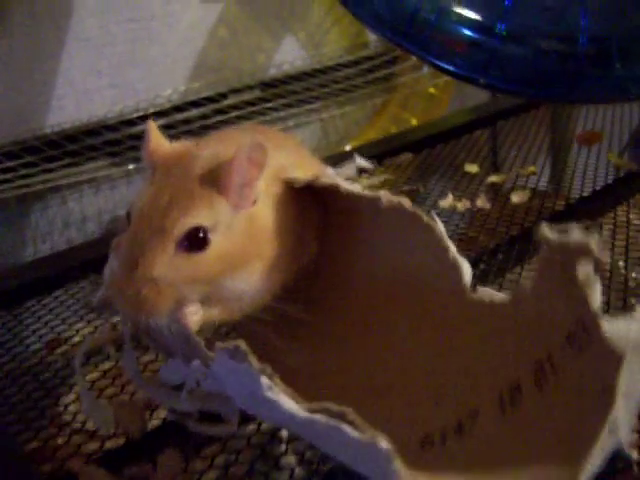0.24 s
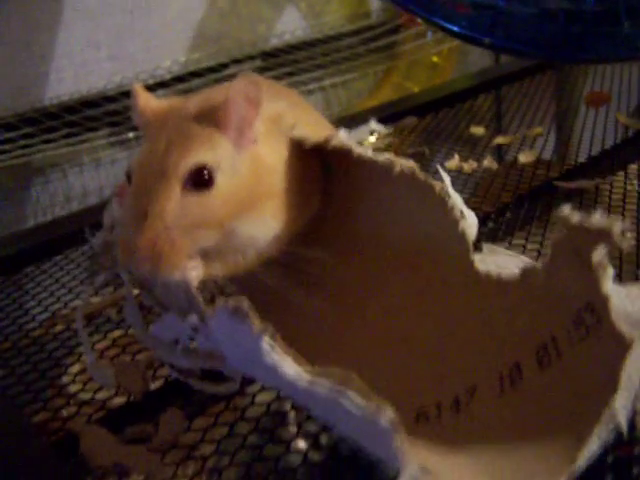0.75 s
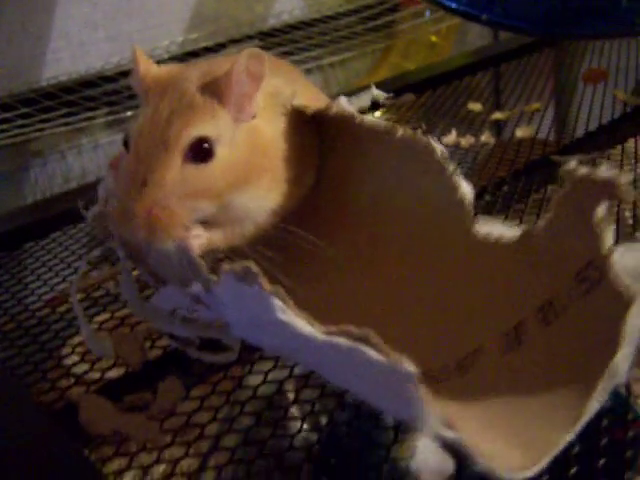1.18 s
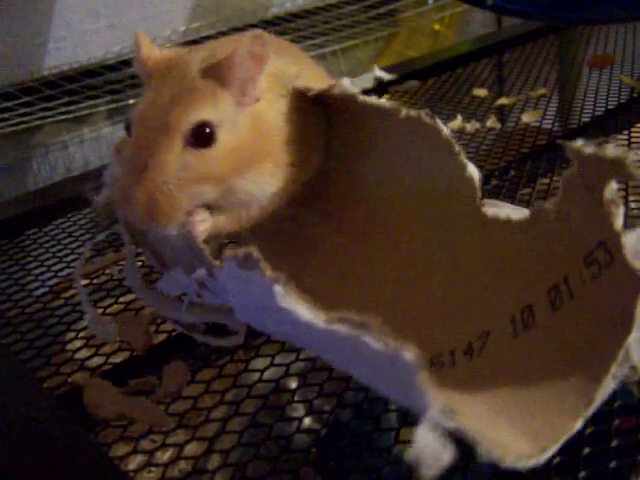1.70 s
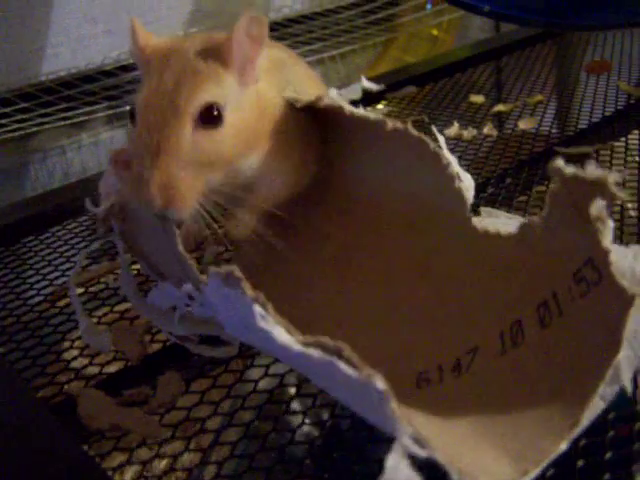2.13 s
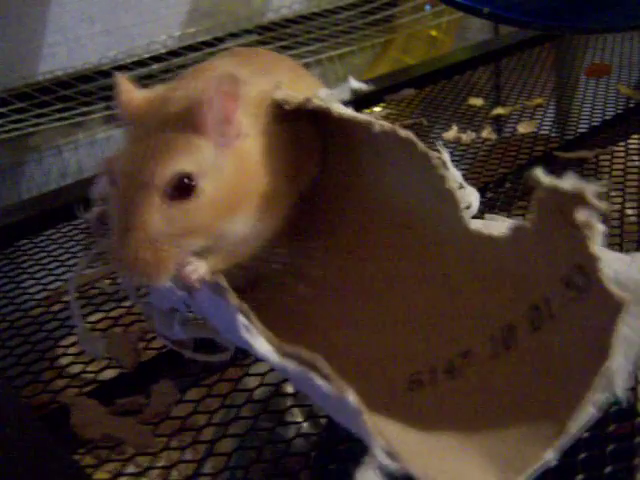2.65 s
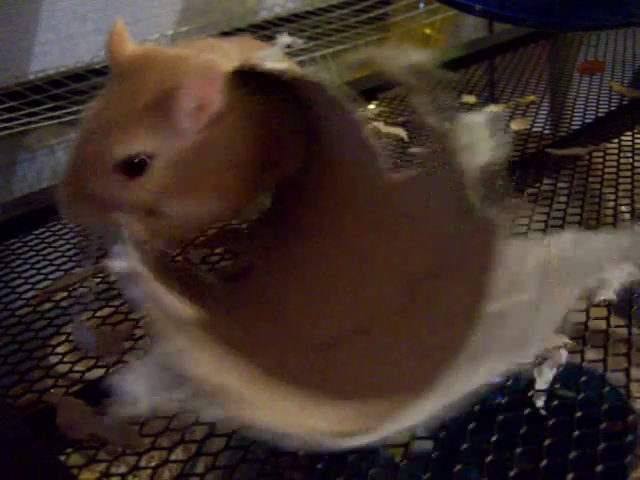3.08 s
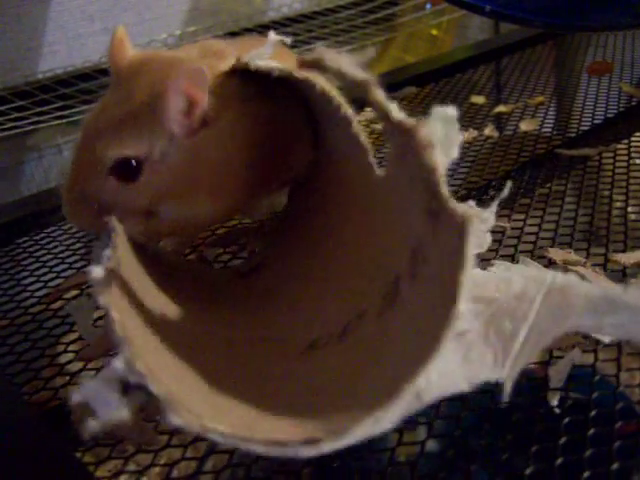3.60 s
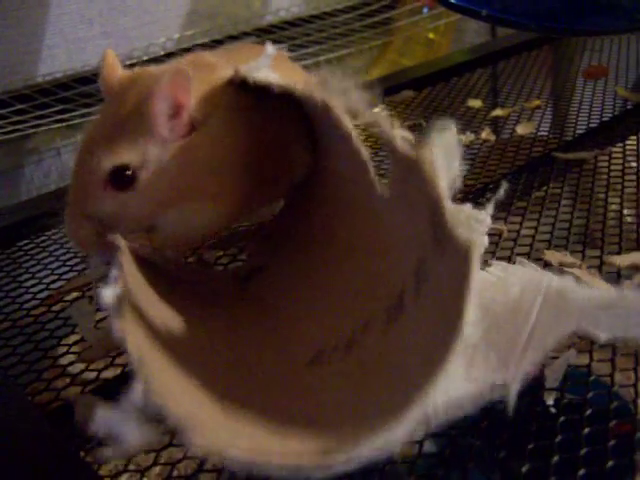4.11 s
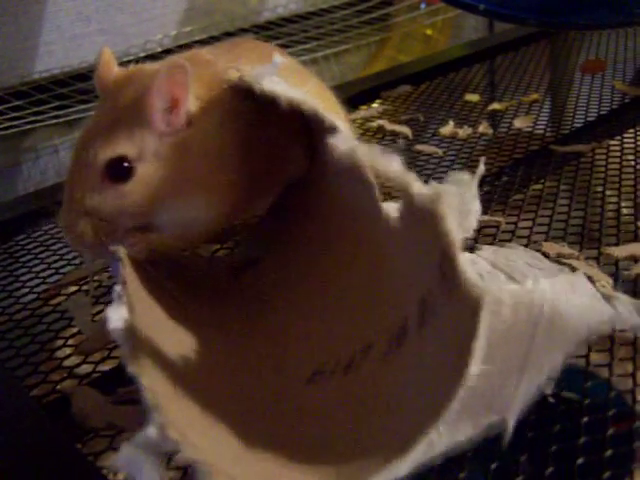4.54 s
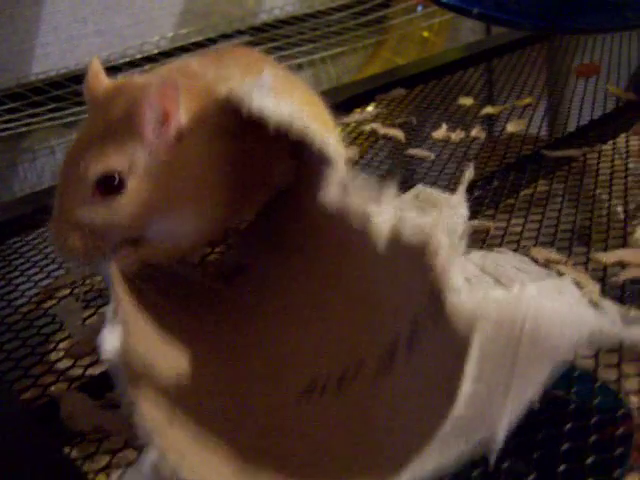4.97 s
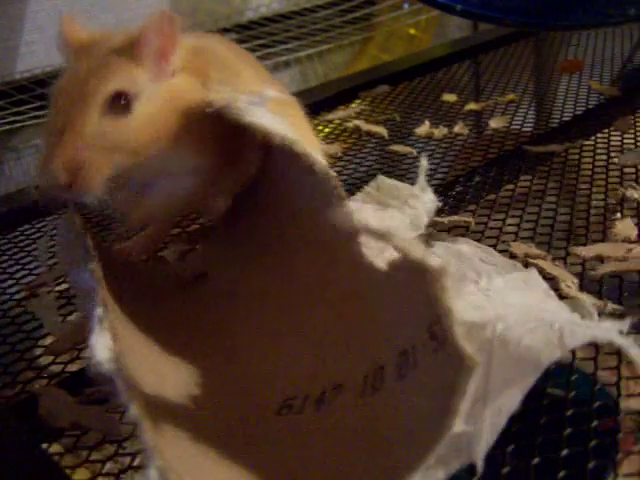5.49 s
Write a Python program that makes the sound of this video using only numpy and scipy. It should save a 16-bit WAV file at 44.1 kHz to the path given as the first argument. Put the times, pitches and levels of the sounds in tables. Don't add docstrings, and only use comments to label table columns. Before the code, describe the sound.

Close, dry crackles and sharp snaps as a gerbil gnaws a cardboard tube, papery rustling between bites over a faint low drone.

```python
import sys
import numpy as np
from scipy import signal
from scipy.io import wavfile
from scipy.ndimage import uniform_filter1d

SR = 44100
rng = np.random.default_rng(int(sys.argv[2]) if len(sys.argv) > 2 else 0)


def volts(x):
    e = np.asarray(x, float) / 20
    return 10 ** e


def int16_out(signal):
    q = np.round(np.clip(np.atleast_2d(signal).T, -1, 1) * 32767)
    wavfile.write(sys.argv[1], SR, q.astype(np.int16))


N = 253134

# start in seconds, peak in dB,
# ring in Hz, relative fibre brightness in dB, cascade length in ms.
RIM_BITES = [(0.0095, -24, 3000, -12, 1.8), (0.2918, -7.5, 2980, -5.5, 4.9), (0.6492, -20, 2890, -4.5, 3),
             (0.8406, -4.5, 3080, -11.5, 2.9), (0.9327, -17.5, 3020, -6.5, 5.9),
             (1.0715, -13.5, 2833, -7, 7), (1.2178, -23, 3370, -6, 3.1), (1.5616, -8, 3570, -10, 4.5),
             (1.735, -22, 3070, -7, 4.3), (1.9012, -16, 3070, -7, 4), (2.3805, -19, 3526, -12.5, 15),
             (2.621, -11, 2660, 0.5, 4.1), (2.7159, -22, 3000, -11.5, 11), (2.7256, -21, 3160, 6, 15),
             (2.8694, -27.5, 2800, -12, 5), (3.0144, -30, 2760, -7, 19), (3.022, -24.5, 2805, -12, 3.7),
             (3.169, -25, 2830, -11.5, 13), (3.279, -17.5, 2635, -3, 1.1), (3.2889, -22.5, 2410, -11, 6),
             (3.4202, -18, 2646, -7.5, 3.6), (4.3732, -21, 3000, -5, 8.5), (5.3079, -29, 2620, -6.5, 8.3),
             (5.6918, -13.5, 3700, -13, 1.7)]
# start in seconds, peak in dB,
# ring in Hz, relative fibre brightness in dB, cascade length in ms.
DEEP_BITES = [(0.1443, -11.5, 3650, -22, 6.1), (0.166, -25, 3390, -17.5, 12),
              (0.3383, -12, 3300, -14.5, 5.1), (1.101, -19.5, 3830, -8.5, 5.9),
              (1.2875, -23.5, 3000, -24, 1.2), (1.608, -26.5, 3340, -14, 4.5),
              (1.6607, -26, 1711, -6.5, 13), (1.8269, -12, 3660, -22.5, 7.1), (1.8496, -24, 1920, -17, 15),
              (1.9208, -15, 2820, -16, 4.1), (2.2141, -23.5, 2780, -17, 3.8), (2.5071, -24.5, 1520, 0, 13),
              (2.7845, -14.5, 3070, -8, 3.4), (2.91, -22, 4830, -11.5, 8.3), (3.4596, -22, 4140, -6, 4.4),
              (3.6642, -26.5, 1700, -1.5, 20), (3.7593, -22.5, 1920, -0.5, 2.3),
              (3.9398, -15.5, 3820, -13, 6.6), (4.1111, -23, 3710, -7.5, 12.4),
              (4.5835, -22.5, 2650, -7, 4.7), (4.5947, -23.5, 3040, -4.5, 12),
              (4.707, -15.5, 3000, -9.5, 11.6), (5.1322, -21, 3030, -0.5, 4.1),
              (5.1754, -5, 1870, -12.5, 1.7)]
# start in seconds, peak in dB,
# relative fibre brightness in dB, cascade length in ms.
NIBBLES = [(0.015, -24, -24, 4.9), (0.243, -29.5, -10, 7), (0.3766, -22.5, -14, 1.3),
           (0.4396, -32, -24, 2.3), (0.5135, -28.5, -32, 4.1), (0.637, -28, -7, 2.2),
           (0.6574, -26, -1, 4.7), (0.7295, -32.5, 0, 8.1), (0.8238, -26, -4, 5.3),
           (0.9813, -25.5, -10, 5.7), (1.0652, -28, -4, 4.3), (1.1241, -25, -7, 8.8),
           (1.2338, -23, -6.5, 3.1), (1.3648, -27.5, -8, 11), (1.3731, -26, 3, 1.8),
           (1.4512, -30, -12.5, 13), (1.534, -29, -5.5, 1.1), (1.6945, -26, -6, 1.6),
           (1.7257, -24.5, -8, 19), (1.7587, -43.5, -15, 6.2), (1.9105, -13.5, -14.5, 6.1),
           (1.947, -28.5, -9, 11), (2.43, -25.5, -7, 5.7), (2.5231, -28.5, -22, 6.8), (2.5472, -22.5, 5, 5),
           (2.604, -31, -12, 3), (2.6516, -24, -28, 8.6), (2.7384, -14.5, -4, 3.4), (2.7443, -21, 13, 1.5),
           (2.862, -28, -20, 6.2)]
# start in seconds, peak in dB,
# relative fibre brightness in dB, cascade length in ms.
ROLLED_NIBBLES = [(2.9665, -30, -3, 27), (3.047, -31.5, -9, 7.6), (3.2215, -36.5, -12, 14),
                  (3.4784, -31, -9.5, 3.2), (3.6833, -29.5, -21, 12), (3.7402, -30, -1.5, 25),
                  (3.8677, -33, -8, 11), (3.9012, -24, 1, 3.2), (3.9115, -32, 1.5, 6.1),
                  (4.1353, -25.5, -8, 3), (4.196, -31, 8, 3.3), (4.296, -32, -4, 8.9),
                  (4.422, -31, -10, 5.5), (4.624, -26, 9, 3), (4.6917, -32.5, -20, 5),
                  (4.7796, -29.5, -2, 2.4), (4.8393, -22, -10.5, 4.9), (4.8656, -32.5, -9, 5.9),
                  (4.9624, -25.5, -8, 13), (4.9698, -27.5, -24, 3.8), (4.9819, -24, -3.5, 23),
                  (5.0439, -33.5, -9, 11), (5.1602, -40, -8.5, 3.2), (5.169, -25, 9, 11.9),
                  (5.239, -29.5, 1, 5.9), (5.252, -29.5, -14, 11), (5.272, -23.5, 4, 5.5),
                  (5.2803, -24, -15, 1.9), (5.5296, -30.5, -2.5, 3.2), (5.580, -20.5, -4.5, 11)]
# start in seconds, peak in dB, ring in Hz.
TICKS = [(0.27, -40, 2850), (0.8003, -44, 2850), (1.208, -32, 2900), (1.4636, -39, 4110),
         (1.7946, -44, 3430), (2.0123, -32.5, 2750), (2.079, -43, 2700), (2.116, -34.5, 4800),
         (2.57, -30.5, 5270), (2.6152, -37, 5500), (3.3947, -31, 1900), (4.229, -40, 2940),
         (4.3236, -31.5, 5100), (4.4668, -34.5, 2650), (4.925, -39, 5040), (5.054, -31.5, 5370),
         (5.211, -36, 4000), (5.503, -48, 6300)]
# frequency in Hz, width in Hz, level in dB.
LOW_WALL_MODES = [(1010, 290, -3), (1545, 480, 4.5), (1920, 1200, -0.5)]
MID_WALL_MODES = [(2683, 243, -5.5), (2760, 150, 4.5), (3070, 70, 1.5), (3660, 178, 1), (3897, 360, -10.5)]
FIBRE_MODES = [(4185, 900, 10.5), (5500, 1110, 14), (6290, 1810, 10.5), (7350, 720, 6.5),
               (8490, 1200, -11.5)]
# time in seconds, level in dB.
DRAG = [(0, -48.5), (0.3, -42.5), (0.58, -52.5), (0.72, -45.5), (1.1, -43), (1.4, -53), (1.7, -41.5),
        (1.9, -49), (2.1, -55.5), (2.5, -41.5), (3.05, -50), (3.3, -41), (3.6, -51), (3.9, -45),
        (4.5, -53.5), (4.65, -43.5), (5.1, -50.5), (5.32, -36.5)]
# start in seconds, peak in dB, ring in Hz,
# 60 dB decay in seconds, relative push in dB.
KNOCKS = [
    (1.069, -30.5, 181, 0.12, 12.5),
    (1.604, -37.5, 262, 0.11, -7),
    (1.9211, -25.5, 119, 0.21, 13),
    (2.696, -34.5, 136.8, 0.17, -10),
    (5.175, -29, 310, 0.031, -13),
    (0.40, -39, 295, 0.13, -5),
    (1.10, -30.5, 648, 0.068, -10),
    (1.31, -36, 700, 0.089, -19),
    (5.30, -37.5, 560, 0.089, -6),
]
# frequency in Hz, 60 dB decay in seconds.
CAGE_DECAY = [(300, 0.85), (1500, 0.16), (3000, 0.11), (8000, 0.11)]
# time in seconds, pitch in Hz, level in dB.
DRONE = [(0.05, 71.3, -33.5), (0.45, 72.3, -42), (0.58, 75, -49), (0.85, 72.3, -41), (1, 73.5, -45),
         (1.15, 75.8, -44), (1.3, 69.7, -46.5), (1.9, 72.4, -50), (2.05, 73.5, -47.5), (2.3, 73, -49),
         (2.88, 71, -50), (3.02, 70.3, -65), (3.2, 69.4, -46.5), (3.42, 68, -47.5), (3.55, 71, -64),
         (4.35, 71.5, -51), (4.85, 73.5, -61), (5.1, 71.8, -47)]
# frequency in Hz, level in dB per Hz.
AIR_SPECTRUM = [(18, -30.5), (45, -10.5), (95, -4.5), (170, -10), (250, -11.5), (450, -18), (680, -15.5),
                (760, -12), (1300, -11), (2000, -20), (3500, -29), (5000, -25), (7300, -47), (8900, -61)]

BITE_LEAD_S = 0.016
TURN_S = 2.6
OPEN_SHIFT = 1.053
SPOT_SHIFT = 0.07


def gnawing():
    rim_kind, deep_kind, nibble_kind = (4, -27), (-3.5, -14), (-8, -22)  # (creep dB, crumbs dB)
    bites = [(s, db, hz, -23.5, *rest, *rim_kind) for s, db, hz, *rest in RIM_BITES]
    for s, db, hz, *rest in DEEP_BITES:
        low_db = -6 + 12.5 * max(np.log2(3000 / hz), 0)
        bites.append((s, db, hz, low_db, *rest, *deep_kind))
    for table, hz, low_db in ((NIBBLES, 2850, -9.5), (ROLLED_NIBBLES, 2960, -10.5)):
        spots_hz = hz * (1 + 0.13 * rng.uniform(-1.2, 1, len(table)))
        for (s, db, *rest), spot_hz in zip(table, spots_hz):
            bites.append((s, db, spot_hz, low_db, *rest, *nibble_kind))
    # little low wall, dulled fibres, 4.1 ms cascade
    bites += [(s, db, hz, -17.5, -7.5, 4.1, *nibble_kind) for s, db, hz in TICKS]

    margin_s = 0.1
    out = np.zeros(N + SR)
    chances = rng.random((len(bites), 3000, 3))
    for (s, *how), chance in zip(bites, chances):
        opening = OPEN_SHIFT if s > TURN_S else 1
        add(out, s + margin_s, bite(*how, opening, chance))
    return out[round((margin_s + BITE_LEAD_S) * SR):][:N]


def bite(db, hz, low_db, bright_db, length_ms, creep_db, crumb_db, opening, chance):
    t = np.arange(len(chance)) / SR - BITE_LEAD_S
    broken = t >= 0
    breaks_per_s = 2400
    sizes = 0.48 + 2.17 * chance[:, 2] ** 3
    breaks = (chance[:, 0] < breaks_per_s / SR) * np.sign(chance[:, 1] - 0.5) * sizes
    breaks = breaks + 0.066 * (chance[:, 1] - 0.5)

    creep = volts(-24 + creep_db - 0.79 * db) * np.exp(np.minimum(t, 0) / 0.0036)
    load = (t < 0) * creep * breaks
    main_break = 30 / length_ms ** 2 * np.exp(-0.5 * ((t - 0.0003) / 0.00003) ** 2)
    cascade = np.minimum(volts(-9 * t * 1000 / max(length_ms - 1.2, 0.4)), 1)
    crumbs = volts(crumb_db - 260 * t)
    drive = broken * (cascade + crumbs) * breaks + main_break + load

    spot = 1 + SPOT_SHIFT * (2 * chance[0, 2] - 1)
    parts = [(drive, [(hz, hz / 9, 0)], -1.5),
             (drive, shifted(MID_WALL_MODES, spot), -5),
             (drive, shifted(LOW_WALL_MODES, spot), low_db),
             (drive + volts(1) * load, shifted(FIBRE_MODES, opening), bright_db)]
    sound = sum(volts(level) * peaked(signal.fftconvolve(x, rings(modes))) for x, modes, level in parts)
    return volts(db) * peaked(sound)


def rustle():
    grains_per_s, spread_db, clump_db = 1600, 2, 2.5
    size = volts(spread_db * np.minimum(rng.exponential(1, N), 4) + clump_db * drift(60))
    slips = size * (rng.random(N) < grains_per_s / SR) * rng.choice([-1., 1.], N)
    spot = np.round(np.clip(drift(30), -2, 2))

    def wandering(modes):
        return evened(sum(struck(slips * (spot == k), modes, 1 + SPOT_SHIFT * k) for k in range(-2, 3)))

    low, mid = wandering(LOW_WALL_MODES), wandering(MID_WALL_MODES)
    still = evened(struck(slips, FIBRE_MODES, 1))
    turned = evened(struck(slips, FIBRE_MODES, OPEN_SHIFT))
    high = np.where(np.arange(N) / SR < TURN_S, volts(-9) * still, volts(-7.5) * turned)
    return pull() * (mid + volts(-6) * low + high)


def pull():
    s, db = np.transpose(DRAG + [(DRAG[-1][0] + 0.066, -55.5)])
    tears, t = np.zeros(N), np.arange(SR // 4) / SR
    for at, peak_db, *_ in RIM_BITES + DEEP_BITES:
        add(tears, at, volts(-32.5 + 0.77 * peak_db) * np.exp(-t / 0.042))
    return np.hypot(volts(np.interp(np.arange(N) / SR, s, db)), tears)


def knocks():
    out, t = np.zeros(N), np.arange(SR // 4) / SR
    for s, db, hz, t60, push_db in KNOCKS:
        ring = np.sin(2 * np.pi * hz * t) + 0.43 * np.sin(2 * np.pi * 1.5 * hz * t + 1.3)
        swell = 1 - np.exp(-t / 0.005)
        push = volts(push_db) * np.exp(-t / 0.00053) * np.sin(2 * np.pi * 1000 * t)
        add(out, s, volts(db - 60 * t / t60) * (-ring * swell + push))
    return out


def cage(x):
    out, t = np.zeros(N), np.arange(N) / SR
    for k in range(3):
        taps = np.zeros(SR // 4)
        at = np.arange(100, len(taps) - 20, 20)
        taps[at + rng.integers(0, 20, len(at))] = rng.choice([-1., 1.], len(at))
        hz, u, z = signal.stft(taps, SR, nperseg=128)
        decay = volts(-60 * u / read(CAGE_DECAY, hz)[:, None])
        tail = signal.istft(z * decay, SR, nperseg=128)[1]
        share = np.sqrt(2 / 3) * np.cos(2 * np.pi * (3.1 * t + k / 3))
        out += signal.fftconvolve(x * share, tail / np.linalg.norm(tail))[:N]
    return out


def drone():
    s, hz, db = np.transpose(DRONE + [(N / SR, DRONE[-1][1], -57.5)])
    t = np.arange(N) / SR
    pitch_hz = np.interp(t, s, hz) * (1 + 0.022 * drift(18))
    throb_db = 1.8 * drift(10)
    level = np.sqrt(2) * volts(np.interp(t, s, db) + throb_db)
    return level * np.sin(2 * np.pi * np.cumsum(pitch_hz) / SR)


def air():
    frames, hz = N // 512 + 5, np.fft.rfftfreq(2048, 1 / SR)
    a, b, patches = rng.standard_normal((frames, 1025, 3)).T
    patches = evened(uniform_filter1d(uniform_filter1d(patches, 14, 0), 10, 1))
    fading_db = np.linspace(2.5, -1.5, frames) / (1 + (hz[:, None] / 450) ** 2)
    z = (a + 1j * b) * volts(read(AIR_SPECTRUM, hz)[:, None] + 1.3 * patches + fading_db)
    return volts(-43) * evened(signal.istft(z, nperseg=2048, noverlap=1536)[1][:N])


def rings(modes, size=700):
    t, out = np.arange(size) / SR, np.zeros(size)
    for k, (hz, width_hz, db) in enumerate(modes):
        decay = width_hz * np.exp(-np.pi * width_hz * t)
        out += (-1) ** k * volts(db) * decay * np.sin(2 * np.pi * hz * t)
    return out


def shifted(modes, factor):
    return [(hz * factor, width_hz, db) for hz, width_hz, db in modes]


def struck(slips, modes, factor):
    return signal.oaconvolve(slips, rings(shifted(modes, factor)))[:N]


def drift(rate_hz, count=24):
    hz, phase = np.geomspace(rate_hz / 12, rate_hz, count), rng.random(count)
    t = np.arange(0, N + 256, 256) / SR
    slow = (np.sin(2 * np.pi * (hz * t[:, None] + phase)) / np.sqrt(hz)).sum(1)
    return np.interp(np.arange(N) / SR, t, evened(slow))


def evened(x):
    return x / np.sqrt(np.mean(x ** 2) + 1e-20)


def peaked(x, size=60):
    return x / np.sqrt(2 * uniform_filter1d(x ** 2, size).max() + 1e-20)


def read(points, hz):
    f, value = np.transpose(points)
    return np.interp(np.log(hz + 1), np.log(f + 1), value)


def add(mix, s, sound):
    part = mix[max(round(s * SR), 0):][:len(sound)]
    part += sound[:len(part)]


def scene():
    no_bass = signal.butter(4, 1000, "high", fs=SR, output="sos")
    near = signal.sosfilt(no_bass, gnawing() + rustle())
    mix = near + volts(-11) * cage(near) + knocks() + drone() + air()
    return mix[None]


def low_pass(x):
    return signal.sosfilt(signal.butter(12, 9010, fs=SR, output="sos"), x)


def record(dry):
    band = signal.firwin(127, 8480, window=("kaiser", 8), fs=SR)
    mix = signal.oaconvolve(dry, band[None], "same")
    return low_pass(mix)


dry = scene()
out = record(dry)
int16_out(out)
```